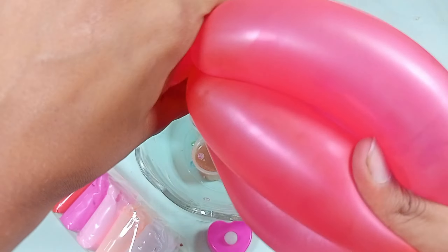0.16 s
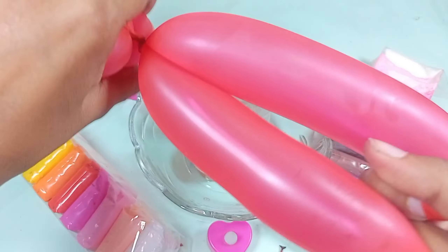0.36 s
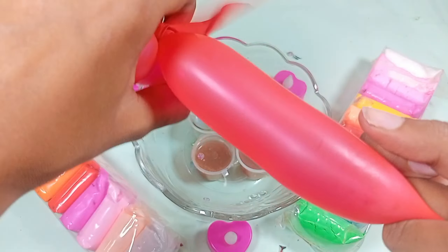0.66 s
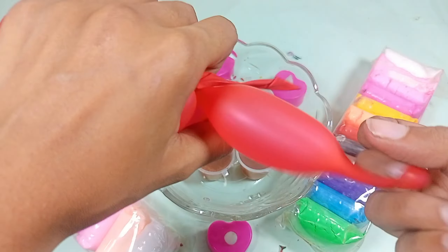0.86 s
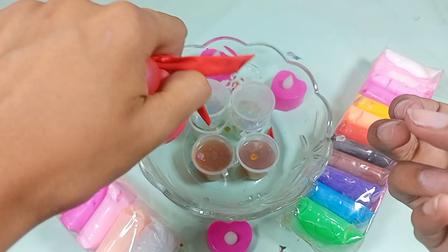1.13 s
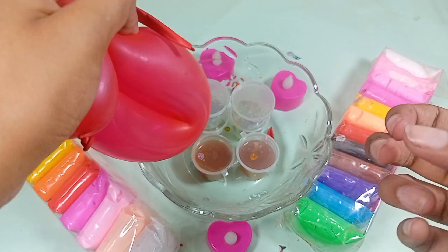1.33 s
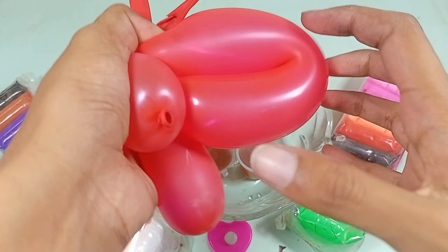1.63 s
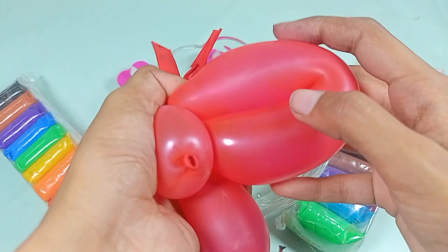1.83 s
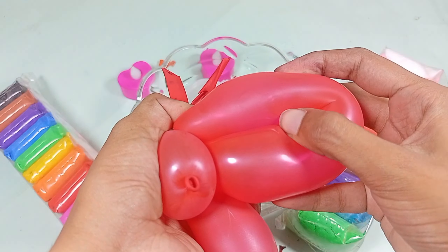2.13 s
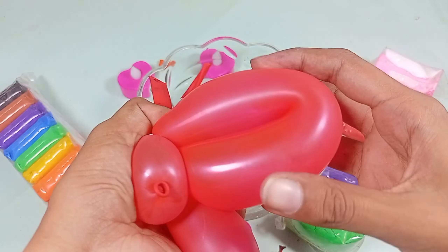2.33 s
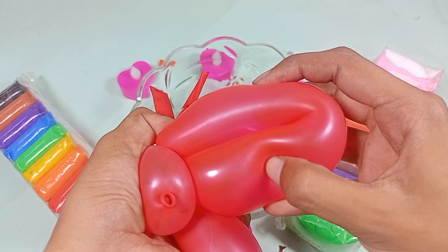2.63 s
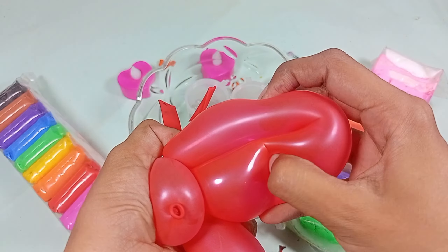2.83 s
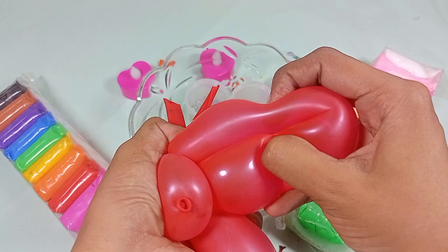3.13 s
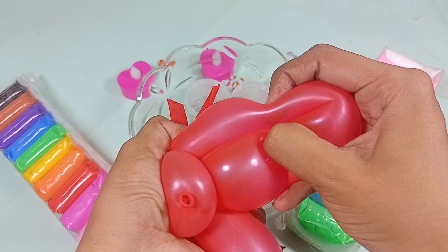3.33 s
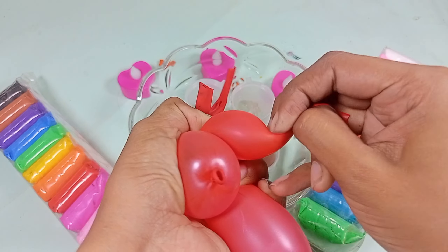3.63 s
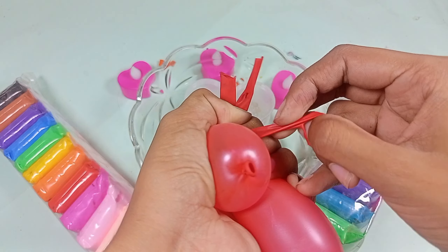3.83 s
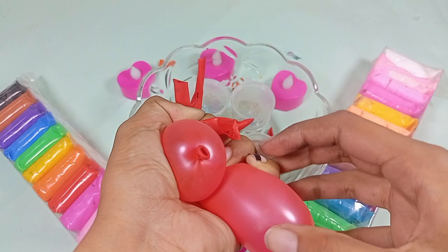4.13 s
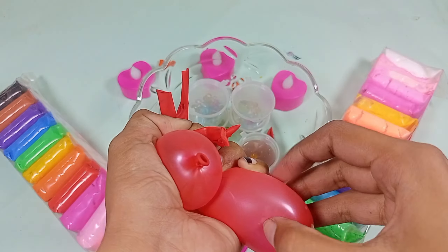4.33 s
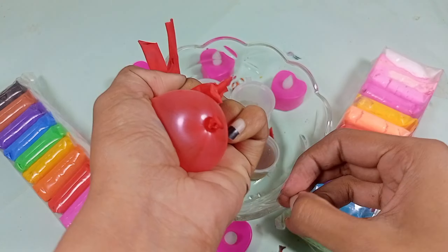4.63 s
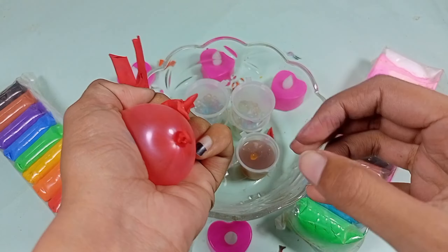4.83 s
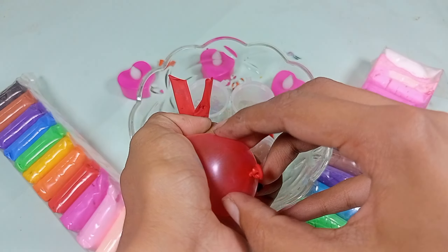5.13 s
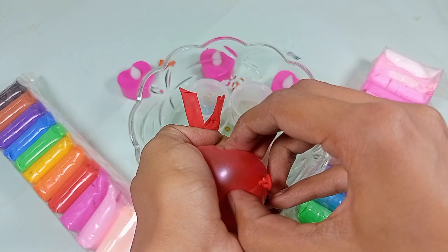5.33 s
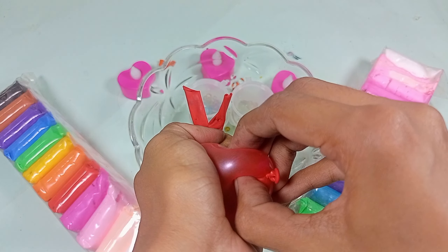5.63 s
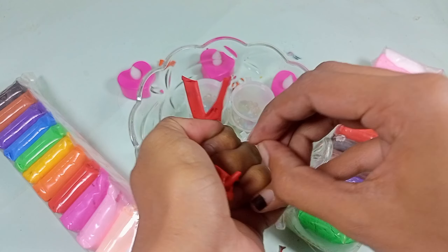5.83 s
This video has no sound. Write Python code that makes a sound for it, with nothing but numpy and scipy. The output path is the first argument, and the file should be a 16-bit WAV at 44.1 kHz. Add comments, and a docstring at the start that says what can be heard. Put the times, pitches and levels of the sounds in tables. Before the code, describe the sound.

Inflated rubber is squeezed and twisted in a hard, reverberant room. Dry stick-slip creaks and snaps surround two falling squeals in the first second; soft low thuds, short squeaks and isolated snaps follow. Four bubbles burst, the last overwhelmingly loud, and automatic gain ducks the recording while the tails ring on.

```python
"""A bare, echoing room: hands twist a latex modelling balloon over a table, close to the microphone.
Skin sticks and slips on the rubber: scuffs, creaks and snaps are noise and pulses through resonances,
squeals are gliding tones with overtones, and thuds are decaying sines. Four bubbles burst as shaped noise
and set the room's decaying tail roaring; the recorder's gain control ducks them and holds their tails level
while it recovers."""
import sys
import numpy as np
from scipy import signal
from scipy.fft import rfft, irfft
from scipy.io import wavfile
from scipy.ndimage import uniform_filter1d, minimum_filter1d

SR = 44100
rng = np.random.default_rng(int(sys.argv[2]) if len(sys.argv) > 2 else 0)


def generate_wav(sig):
    """Save sig (samples, or channels by samples) to the path in sys.argv[1] as 16-bit PCM at SR."""
    pcm = np.round(np.clip(np.atleast_2d(sig).T, -1, 1) * 32767).astype(np.int16)
    wavfile.write(sys.argv[1], SR, pcm)


N = 262836
TIME = np.arange(N) / SR
CUTOFF_HZ = 16000


def from_db(db):
    """Decibels to gain."""
    return 10 ** (np.asarray(db) / 20)


def rms_one(x):
    """Scale to rms 1."""
    return x / np.sqrt(np.mean(x ** 2) + 1e-20)


def in_time(rows):
    """The sample times that a curve covers, and its columns at those times."""
    s, *columns = np.transpose(rows)
    t = np.arange(max(s[0], 0), s[-1], 1 / SR)
    return [t] + [np.interp(t, s, column) for column in columns]


def at_hz(points, hz):
    """Read a table on a log-frequency axis."""
    table_hz, values = np.array(points)[:, 0], np.array(points)[:, 1]
    return np.interp(np.log(hz + 1e-9), np.log(table_hz), values)


def add(out, s, x):
    """Mix x into out from time s on."""
    i = max(round(s * SR), 0)
    out[i:i + len(x)] += x[:max(N - i, 0)]


def band(x, low_hz, high_hz, order=2):
    """Butterworth band-pass."""
    edges_hz = [low_hz, min(high_hz, .45 * SR)]
    return signal.sosfilt(signal.butter(order, edges_hz, "band", fs=SR, output="sos"), x)


def resonate(x, hz, width_hz):
    """One resonance, gain 1 on top."""
    r = np.exp(-np.pi * width_hz / SR)
    numerator = np.array([1, 0, -1]) * (1 - r * r) / 2
    denominator = [1, -2 * r * np.cos(2 * np.pi * hz / SR), r * r]
    return signal.lfilter(numerator, denominator, x + 1e-18)


def colour(x, spectrum, size=4096):
    """Causal (minimum-phase) filter with the given spectral shape and unit energy."""
    bins_hz = np.arange(size // 2 + 1) * SR / size
    cepstrum = irfft(np.log(from_db(at_hz(spectrum, bins_hz))))
    # folding the cepstrum forward in time makes the filter causal
    cepstrum[1:size // 2] *= 2
    cepstrum[size // 2 + 1:] = 0
    response = irfft(np.exp(rfft(cepstrum)))
    return signal.fftconvolve(x, response / np.linalg.norm(response))[:len(x)]


def wobble(t, per_s):
    """Smooth chance with a spread near 1."""
    return np.interp((t - t[0]) * per_s, np.arange(N // 4), rng.standard_normal(N // 4))


def fade(t, t60):
    """Exponential decay by 60 dB in t60 seconds."""
    return np.exp(-np.log(1000) * t / max(t60, 1e-3))


def stroke(length_s, attack_s, release_s):
    """One movement of a finger: its sample times, its progress from 0 to 1 and its envelope."""
    t = TIME[:int(length_s * SR)]
    ramp = np.clip(np.minimum(t / attack_s, (length_s - t) / release_s), 0, 1)
    return t, t / length_s, np.sin(np.pi / 2 * ramp)


# spectral shape of the faint steady noise: (frequency [Hz], relative density [dB per Hz])
HUSH_SPECTRUM = [(18, -14), (30, -18), (95, 2), (1460, -6), (4910, -17.5), (6210, -33), (8080, -27),
                 (14800, -51.5), (16000, -54)]
HUSH_DB = -45


def hush():
    """Coloured noise runs steadily under the whole scene."""
    return from_db(HUSH_DB) * colour(rng.standard_normal(N), HUSH_SPECTRUM)


# spectral shape of rubber at the microphone: (frequency [Hz], relative density [dB per Hz])
RUBBER_SPECTRUM = [(59, -62), (100, -24), (219, -16), (398, -8), (705, 1.5), (1130, -6), (1910, -1),
                   (2470, -3), (4110, -7), (5900, -24.5), (16000, -26.5)]
# fingers scuff over the rubber: (time [s], length [s], starting effort before the common level [dB])
RUBS = [(0, 0.18, -18.5), (.51, 0.14, -12.5), (0.805, 0.18, -20.5), (.93, 0.44, -25), (1.616, 0.27, -27.5),
        (1.879, 0.23, -30.5), (2.056, .3, -24), (2.513, 0.54, -36.5), (4.243, 0.18, -48),
        (4.941, 0.233, -33)]


def scuffing(grains_per_s=2000, spread_db=3.0, clump_db=5, level_db=-6.5, attack_s=0.036, release_s=0.055,
             easing_db=7, holding_db=-55):
    """Tiny slips clump under the fingertips; each rub starts firmly and eases, a still grip barely stirs."""
    effort = np.full(N, from_db(holding_db))
    for s, length_s, db in RUBS:
        t, progress, envelope = stroke(length_s, attack_s, release_s)
        add(effort, s, from_db(db - easing_db * progress) * envelope)
    sizes = from_db(spread_db * np.minimum(rng.exponential(1, N), 5)) * rng.choice([-1, 1], N)
    grains = rms_one(sizes * (rng.random(N) < grains_per_s / SR))
    clumps = from_db(level_db + clump_db * wobble(TIME, 90))
    return colour(grains * effort * clumps, RUBBER_SPECTRUM)


# slow stick-slip: (time [s], length [s], typical slip rate [1/s], start resonance [Hz], end resonance [Hz],
# level before the band-pass [dB])
CREAKS = [(0, 0.071, 370, 520, 430, -21), (0.083, 0.021, 420, 430, 425, -21),
          (0.158, 0.063, 340, 2520, 2660, -23), (1.563, .04, 540, 1420, 630, -21.5),
          (2.007, 0.076, 460, 1510, 1670, -28.5), (2.104, 0.049, 700, 2100, 2400, -17.5),
          (2.14, 0.18, 600, 660, 586, -22.5), (4.023, .2, 790, 1060, 1120, -36)]


def creaks(jitter=0.36, width=0.11, broad=0.63, attack_s=0.0033, release_s=0.027):
    """Uneven stick-slip: separate pulses knock a broad resonance that moves with the tension."""
    out = np.zeros(N)
    centres_hz = np.geomspace(300, 3600, 9)
    for s, length_s, per_s, start_hz, end_hz, db in CREAKS:
        t, progress, envelope = stroke(length_s, attack_s, release_s)
        hz = start_hz * (end_hz / start_hz) ** progress
        cycles = np.floor(np.cumsum(per_s * np.exp(jitter * wobble(t, 400))) / SR)
        pulses = np.diff(cycles, prepend=0) * from_db(2.0 * wobble(t, 500))
        # the moving resonance is a crossfade between fixed ones
        ring = 0
        for centre in centres_hz:
            nearness = np.exp(-(2.54 * np.log2(hz / centre)) ** 2)
            ringing = resonate(resonate(pulses, centre, width * centre), centre, 3 * centre)
            ring = ring + nearness * rms_one(ringing)
        # slack rubber creaks dully, taut rubber brightly
        crackle = broad * (hz / 1800) ** 2 * rms_one(colour(pulses, RUBBER_SPECTRUM))
        add(out, s, from_db(db) * envelope * rms_one(rms_one(ring) + crackle))
    return band(out, 220, CUTOFF_HZ, order=3)


# decay of the room: (frequency [Hz], t60 [s])
ROOM_T60 = [(100, 2.8), (200, 1.38), (450, 1.144), (1200, 1.117), (2500, 1.013), (5000, 0.63), (9000, 0.52),
            (15000, 0.5)]
# standing waves of the room: (frequency [Hz], width [Hz], gain of each alone on top [dB])
ROOM_MODES = [(100, 6.1, -3.5), (171.4, 5.4, 12.5), (172.4, 24, 1), (356.5, 66, 0.5)]


def room_response():
    """Diffuse tail of unit energy: the treble dies first, standing waves shape the bass."""
    t, edges_hz = TIME[:2 * SR], np.geomspace(40, 18000, 19)
    white = rng.standard_normal((2, len(t)))
    diffuse = 0
    for k, (low, high) in enumerate(zip(edges_hz, edges_hz[1:])):
        decay = fade(t, at_hz(ROOM_T60, np.sqrt(low * high)))
        diffuse = diffuse + band(white[k % 2], low, high, order=3) * decay
    modes = sum((from_db(db) - 1) * resonate(diffuse, hz, width) for hz, width, db in ROOM_MODES)
    # the first reflections take a moment to arrive
    tail = (diffuse + modes) * (1 - np.exp(-t / 0.0023))
    return tail / np.linalg.norm(tail)


SLIDE_S = .0016


def slip(hz, bass_db, treble_db, broad=0.52, t60=0.019, skin_hz=2300):
    """A slip releases a short shiver of the taut skin, with a low bump and a bright tick; peak 1."""
    t = TIME[:SR // 16]
    # noise holds steady during the slide, then dies away
    skin, bump, tick = rng.choice([-1, 1], (3, len(t))) * fade(np.maximum(t - SLIDE_S, 0), t60)
    # the pinched patch rings at its own pitch, the whole skin always at the same one
    skin = resonate(skin, hz, 0.27 * hz) + .5 * resonate(skin, skin_hz, 280) + broad * skin
    skin = rms_one(band(skin, 650, 3370, order=3))
    bump = from_db(bass_db) * rms_one(band(bump, 273, 470))
    tick = from_db(treble_db) * rms_one(band(tick * fade(t, 0.051), 4500, 28500))
    snap = skin + bump + tick
    return snap / np.abs(snap).max()


# skin slips on rubber, once or in a quick judder: (time [s], peak before the common level [dB],
# ring frequency [Hz], treble before the common trim [dB], number of slips)
SLIPS = [(.016, -2, 695, -15, 1), (0.0344, -3.5, 705, -15, 1), (.044, 2.5, 680, -11, 1),
         (0.0981, 2, 2270, -18, 3), (.136, 2, 2300, -27, 1), (0.24, -3, 1300, -20, 1),
         (0.546, 1, 3610, -12.5, 1), (.859, -3.5, 2530, -7.5, 1), (0.963, -4.5, 2700, -14.5, 1),
         (1.141, -2.5, 2225, -9, 1), (1.205, -4.5, 2640, -1.5, 1), (1.223, -4.5, 2570, -2, 1),
         (1.251, 4, 3570, -13, 1), (1.578, -8.5, 1310, -5, 1), (1.721, -5.5, 1190, -25, 1),
         (1.785, -11, 790, -33, 1), (1.981, -4, 1370, -15, 1), (2.002, -8.5, 1516, -11, 1),
         (2.018, 3, 1060, -19, 1), (2.0385, 2.5, 1080, -26, 7), (2.238, 1.5, 1030, -33, 1),
         (2.788, -8.5, 1650, -22, 2), (2.851, -13.5, 1924, -20, 1), (2.8853, 1, 1135, -19, 1),
         (3.003, -12, 1210, -20, 1), (3.018, 0.5, 2000, -18.5, 1), (3.121, 2, 1700, -18, 1),
         (3.241, 1, 1510, -15, 1), (3.343, -12.5, 1320, -7, 1), (3.408, -13, 2200, -10, 2),
         (3.686, -5.5, 2200, 7, 1), (3.885, -8, 1030, -10.5, 1), (4.1, -15, 1104, -28, 1),
         (4.199, -17.5, 1080, -15, 1), (4.272, -14, 1600, -22, 1), (4.309, -10.5, 2210, -20.5, 1),
         (4.356, -15, 2040, -27, 3)]
# low bump of the slips over the scene: (time [s], level before the common trim [dB])
BUMP = [(0, -13.5), (.86, -11.5), (1.2, -27), (2.8, -31), (2.95, -14), (3.3, -40)]
JUDDER_GAP_S, JUDDER_LOSS_DB = .0103, 0.5   # from one slip of a judder to the next


def slips(level_db=-1.5, bass_db=6.0, treble_db=-2.0):
    """In a judder the skin catches and lets go at a steady rate, a little weaker each time."""
    out = np.zeros(N)
    for s, db, hz, treble, count in SLIPS:
        bass = np.interp(s, *np.transpose(BUMP))
        for k in range(round(count)):
            gain = from_db(db + level_db - k * JUDDER_LOSS_DB)
            add(out, s + k * JUDDER_GAP_S, gain * slip(hz, bass + bass_db, treble + treble_db))
    return out


# bubbles burst: (time [s], level before the gain control [dB])
POPS = [(0.2184, -1), (3.4282, 2), (4.4006, 10.5), (5.5997, 55)]
# one spectral shape per burst: (frequency [Hz], relative density [dB per Hz])
POP_SPECTRA = [
    [(41, -84.5), (70, -22), (649, -10), (1020, -13), (1280, -7.5), (1610, -10), (2120, -9), (5750, -28.5),
     (16000, -40)],
    [(41, -49), (70, -13.5), (129, 2), (250, 0.5), (360, 3.5), (1170, 14), (2720, 7.5), (6750, -14.5),
     (8660, -17.5), (16000, -26)],
    [(41, -69), (70, -36), (190, -17.5), (262, -18), (394, -12), (529, -13), (1150, -2.5), (1810, -1),
     (3650, -9.5), (5750, -31.5), (8470, -38.5), (16000, -44)],
    [(41, -84), (70, -37), (204, -25), (262, -21.5), (394, -15.5), (441, -20.5), (1050, -14), (2070, -6),
     (5500, -28), (8660, -38), (11100, -44), (16000, -44)],
]


def pops(room, tear_t60=0.029, room_db=27.5):
    """The skin tears in a few milliseconds and the blast fills the room."""
    out, t = np.zeros(N), TIME[:len(room)]
    for (s, db), spectrum in zip(POPS, POP_SPECTRA):
        tear = colour(rng.standard_normal(len(t)) * fade(t, tear_t60), spectrum)
        tear = tear * np.sqrt(0.008 * SR) / np.linalg.norm(tear)
        roar = from_db(room_db) * colour(room, spectrum)
        add(out, s, from_db(db) * (tear + roar))
    return out


# how well the skin radiates a squeal's overtones: (frequency [Hz], gain [dB])
OVERTONE_COLOUR = [(4500, 7), (6200, -1.5), (8500, 5), (11500, -1.5), (15000, 3.5)]


def stick_slip(t, hz, overtones_db, fall_db, rough, jitter=0.101, shimmer_db=0.73, flicker_db=1.5,
               rasp_db=-17.5):
    """Fast, regular stick-slip: a strong fundamental, flickering overtones, and rasp as the grip roughens."""
    unsteadiness = jitter * rough * wobble(t, 1500) + 0.0046 * wobble(t, 127)
    phase = 2 * np.pi * np.cumsum(hz * (1 + unsteadiness)) / SR
    tone = np.sin(phase)
    for k in range(2, 8):
        slope_db = fall_db * np.log2(k / 2)
        flicker = flicker_db * wobble(t, 138.7)
        gain = from_db(overtones_db + slope_db + at_hz(OVERTONE_COLOUR, k * hz) + flicker)
        tone = tone + gain * (k * hz < CUTOFF_HZ) * np.sin(k * phase)
    # the rasp swells once in every cycle
    rasp = colour(rng.standard_normal(len(t)), RUBBER_SPECTRUM) * (1 + np.cos(phase))
    rasp = from_db(rasp_db) * rough * rasp
    return from_db(shimmer_db * wobble(t, 125.7)) * (np.sqrt(2) * tone + rasp)


# long squeals, one table each: (time [s], central pitch [Hz], level before the common gain [dB])
SQUEALS = [
    [(0.303, 4890, -23), (0.321, 4022, -12.5), (0.335, 3585, -6.5), (0.349, 3510, -14),
     (0.373, 4380, -24.5), (0.402, 6000, -43)],
    [(0.457, 5520, -42.5), (0.471, 4745, -23), (0.487, 4290, -15), (0.509, 3895, -8.5), (0.531, 3584, -13),
     (0.555, 3750, -17), (0.577, 3540, -15), (0.605, 3137, -8.5), (0.659, 3060, -2.5), (0.681, 2493, -6),
     (0.697, 2550, -2), (0.715, 2340, -7), (0.777, 1538, -9.5), (0.801, 1893, -12.5), (0.805, 1850, -30),
     (0.817, 1611, -10), (0.83, 1374, -28)],
]
SQUEAL_GAIN_DB = 1.5
# a squeal grows purer and smoother as it gets louder and higher
TYPICAL_HZ, TYPICAL_DB = 3100, -14.5
PURITY_PER_DB, PURITY_DB_PER_OCTAVE = 1.42, 12.5
OVERTONES_DB, ROUGHNESS = -19.5, 0.127   # of the typical squeal, before the break-up loss
BREAKUP_DB = -15   # overtones lost when the grip is fully rough


def squeals(fall_db=-5.5, rough_fall_db=-14, edge_s=0.0067):
    """Rubber drags in long glides; weak or low stretches are richer, rougher and lose their top overtones."""
    out = np.zeros(N)
    for rows in SQUEALS:
        t, hz, db = in_time(rows)
        loud_purity_db = PURITY_PER_DB * (db - TYPICAL_DB)
        purity_db = loud_purity_db + PURITY_DB_PER_OCTAVE * np.log2(hz / TYPICAL_HZ)
        rough = np.clip(ROUGHNESS * from_db(-purity_db), 0, 1)
        overtones_db = OVERTONES_DB - purity_db + BREAKUP_DB * rough ** 2
        tone = stick_slip(t, hz, overtones_db, fall_db + rough_fall_db * rough, rough)
        ramp = np.clip(np.minimum(t - t[0], t[-1] - t) / edge_s, 0, 1)
        add(out, t[0], from_db(db + SQUEAL_GAIN_DB) * tone * np.sin(np.pi / 2 * ramp) ** 2)
    return out


# a whole bubble rebounds under the fingers: (time [s], level before the mix of bounce and rasp [dB],
# bounce frequency [Hz], bounce t60 [s], skin rasp before that mix [dB])
THUDS = [(1.4842, -1.5, 291, 0.029, -9), (1.579, -1.5, 270, 0.024, -4.5), (1.589, -16.5, 109, 0.19, -16),
         (1.681, -8, 254, 0.099, 0.5), (1.6986, 1.5, 261, 0.056, 4.5), (1.719, -1.5, 250, 0.042, 5.5)]


def thuds(rasp_t60=0.043):
    """The air in a bubble bounces for a few cycles while its skin rasps."""
    out, t = np.zeros(N), TIME[:SR // 6]
    for s, db, hz, t60, rasp_db in THUDS:
        bounce = np.sin(2 * np.pi * hz * t) * fade(t, t60) * (1 - np.exp(-t / 0.0014))
        rasp = rms_one(band(rng.standard_normal(len(t)), 525, 1280, order=3)) * fade(t, rasp_t60)
        add(out, s, from_db(db) * (1.24 * bounce + 0.42 * from_db(rasp_db) * rasp))
    return out


# short squeaks: (time [s], length [s], start pitch [Hz], end pitch [Hz], level [dB],
# overtones [dB], overtone slope [dB per octave], roughness [0-1], share sent to the room [dB])
SQUEAKS = [(2.111, 0.033, 781, 1620, -9, -12.5, -13, 0.84, -16),
           (2.262, 0.039, 331.7, 411.3, -11, -10, -6.5, 0.61, -15),
           (3.674, .02, 2606, 2097, -6, -19.5, -2, 0.3, -13.5),
           (3.678, 0.011, 8560, 8520, -19, -30, -7, 0.03, -7.5)]


def squeaks(attack_s=0.012, release_s=0.014, glide_share=0.61):
    """A short slide swells, eases to another pitch and stays; gives the direct sound and the room's share."""
    out, into_room = np.zeros((2, N))
    for s, length_s, start_hz, end_hz, db, overtones_db, fall_db, rough, room_db in SQUEAKS:
        t, progress, envelope = stroke(length_s, attack_s, release_s)
        glide = np.sin(np.pi / 2 * np.minimum(progress / glide_share, 1)) ** 2
        hz = start_hz * (end_hz / start_hz) ** glide
        squeak = from_db(db) * envelope * stick_slip(t, hz, overtones_db, fall_db, rough)
        add(out, s, squeak)
        add(into_room, s, from_db(room_db) * squeak)
    return out, into_room


# fingernails flick the slack rubber: (time [s], peak level [dB])
TICKS = [(2.7674, -35), (4.826, -27), (4.882, -23), (4.941, -28), (4.976, -28), (5.022, -41)]


def ticks(t60=0.014):
    """A nail on limp rubber gives only a thin, bright click."""
    out, t = np.zeros(N), TIME[:SR // 16]
    for s, db in TICKS:
        click = band(rng.standard_normal(len(t)) * fade(t, t60), 2600, 8500)
        add(out, s, from_db(db) * click / np.abs(click).max())
    return out


def scene():
    """The balloon close to the microphone, the room behind it."""
    room = room_response()
    scuff, creak = band(scuffing(), 200, CUTOFF_HZ), creaks()
    snaps, squeal = slips() + ticks(), squeals()
    thud = band(thuds(), 46, CUTOFF_HZ)
    squeak, squeak_into_room = squeaks()
    into_room = (from_db(-15) * (snaps + scuff) + from_db(-22.0) * thud + from_db(-16.0) * squeal
                 + from_db(-10) * creak + squeak_into_room)
    echo = signal.fftconvolve(into_room, room)[:N]
    balloon = snaps + thud + squeal + squeak + creak + scuff
    return (balloon + pops(room) + echo + hush())[None]


def gain_control(x, limit_db=-4.0, hold_s=0.083, release_db_per_s=63.5):
    """Looks a little ahead, ducks at once, holds and then recovers slowly."""
    level_db = 10 * np.log10(np.maximum(uniform_filter1d(x ** 2, size=330), 1e-12))
    excess_db = np.maximum(level_db - limit_db, 0)
    hold = int(hold_s * SR / 2)
    # the highest excess of the last hold_s seconds
    held_db = -minimum_filter1d(-excess_db, size=2 * hold + 1, origin=hold, mode="nearest")
    recovery_db = release_db_per_s * TIME
    duck_db = np.maximum.accumulate(held_db + recovery_db, axis=-1) - recovery_db
    return x * from_db(uniform_filter1d(minimum_filter1d(-duck_db, size=330), size=330))


# ringing of the microphone port: (frequency [Hz], width [Hz], level of the added ring [dB])
PORT = [(8690, 740, 9), (14670, 550, 2.5)]


def record(dry):
    """The microphone port rings in the treble; gain control, overload and a steep cut follow."""
    ringing = sum(from_db(db) * resonate(dry, hz, width) for hz, width, db in PORT)
    x = gain_control(dry + ringing)
    x = x / (1 + x ** 8) ** (1 / 8)   # overload: bends only the highest peaks
    return signal.sosfilt(signal.ellip(12, .2, 90, CUTOFF_HZ, fs=SR, output="sos"), x)


dry = scene()
out = record(dry)
generate_wav(out)
```